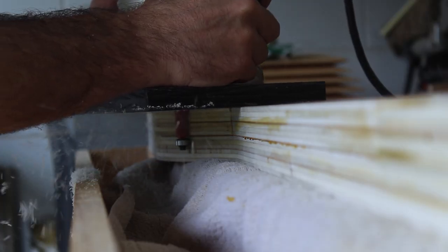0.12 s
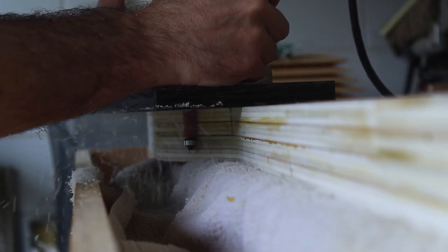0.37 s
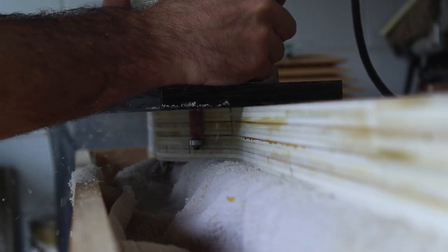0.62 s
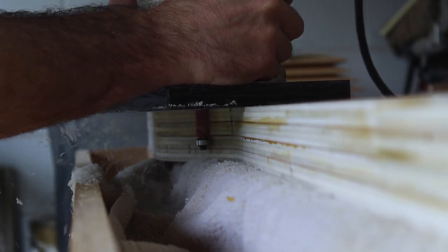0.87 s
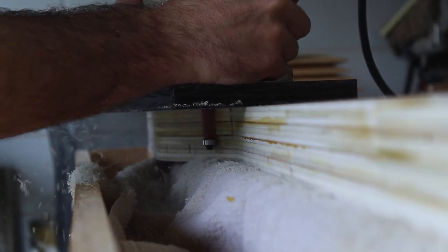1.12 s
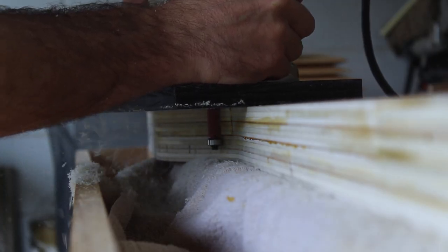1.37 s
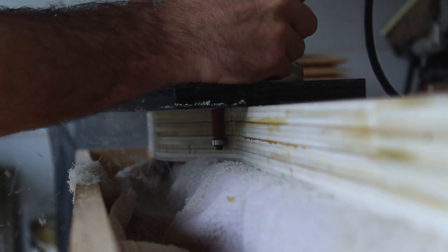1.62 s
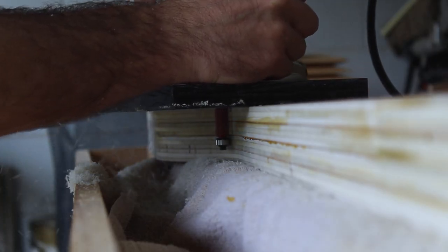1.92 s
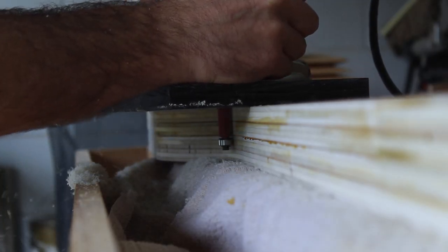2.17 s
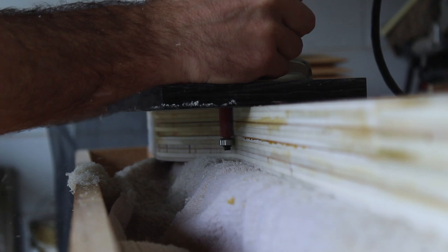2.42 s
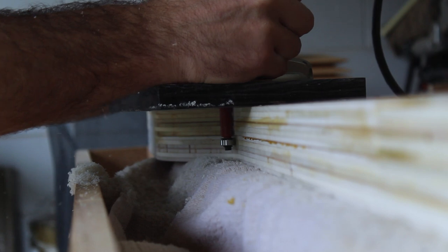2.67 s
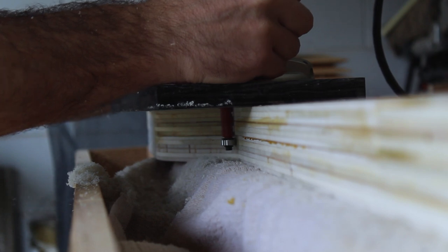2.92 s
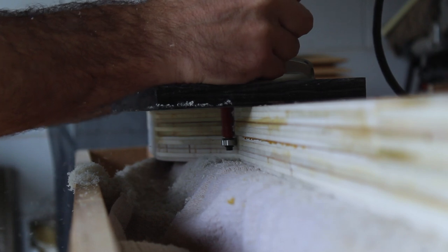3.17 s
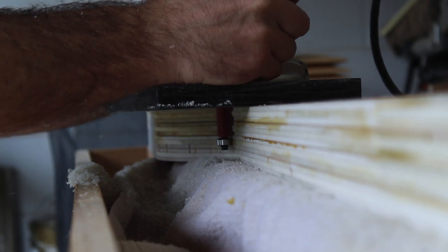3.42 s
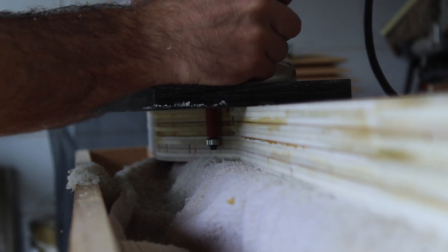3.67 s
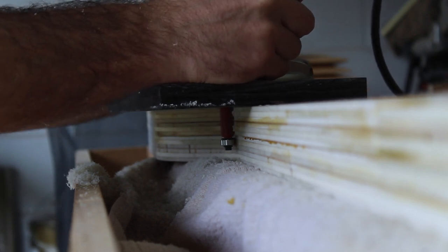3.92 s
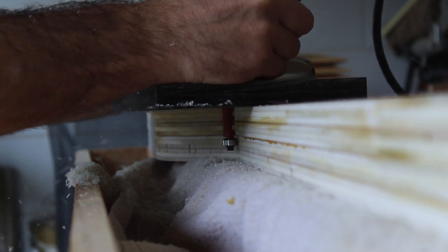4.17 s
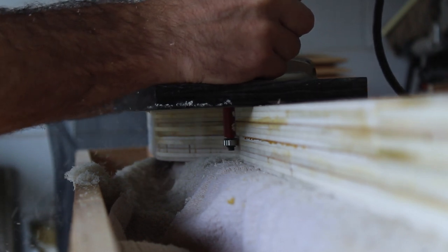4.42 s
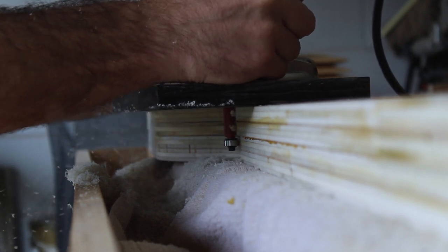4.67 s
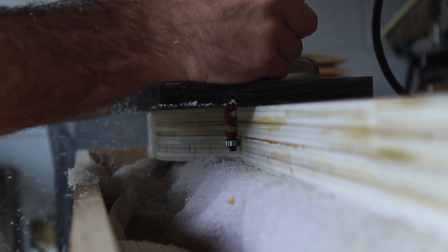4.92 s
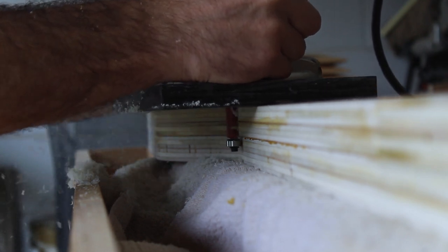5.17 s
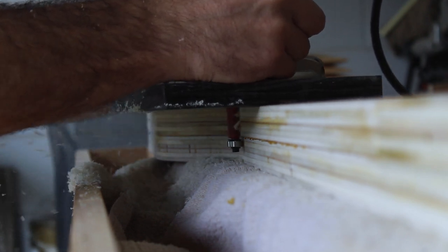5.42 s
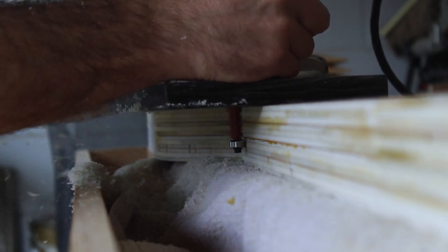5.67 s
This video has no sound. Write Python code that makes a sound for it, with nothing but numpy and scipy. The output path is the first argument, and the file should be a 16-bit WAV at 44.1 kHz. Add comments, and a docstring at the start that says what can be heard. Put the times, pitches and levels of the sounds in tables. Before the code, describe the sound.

A small trim router whines high and steady over dense hissing as it shaves a plywood edge, its pitch sagging and climbing with load.

```python
"""In a workshop a trim router runs along a plywood edge, heard through one thin-sounding microphone.
Its whine is a clean stack of overtones that sags under load and climbs when the cut lightens;
it is made of sine waves on whole multiples of one pitch.
Cooling air and the shearing of wood make a dense hiss: noise coloured by the housing, the board
and near surfaces, split into bands that rise, fall and flicker."""
import sys
import numpy as np
from scipy import signal
from scipy.fft import rfft, irfft
from scipy.io import wavfile
from scipy.ndimage import uniform_filter1d

SR = 44100
rng = np.random.default_rng(int(sys.argv[2]) if len(sys.argv) > 2 else 0)


def boost_factor(decibels):
    """Convert a level in decibels to a linear amplitude factor."""
    exponent = np.asarray(decibels, float) / 20
    return 10 ** exponent


def put_to_file(sound):
    """Save the sound as 16-bit audio at rate SR, in the file named by the first command-line argument."""
    columns = np.atleast_2d(sound).T  # one column per channel
    safe = np.clip(columns, -1, 1)
    whole_steps = np.round(safe * 32767)
    wavfile.write(sys.argv[1], SR, whole_steps.astype(np.int16))


N = 256220   # length of the scene in samples


def whine(jitter_hz, flutter_db, upper_flutter_db):
    """Overtones of the spindle's trembling pitch swell, drop out and break up while the pitch climbs."""
    # spindle pitch, sagging as the bit bites and jumping when the cut lightens: t/s, f/Hz
    pitch_path = [(0.0, 1700.0), (0.238, 1680.2), (0.442, 1682.6), (0.672, 1695.4), (0.946, 1667.3),
                  (1.091, 1648.2), (1.285, 1657.2), (1.385, 1650.1), (1.575, 1673.6), (1.699, 1653.9),
                  (1.919, 1693.5), (2.138, 1710.7), (2.173, 1721.4), (2.238, 1766.8), (2.293, 1775.6),
                  (2.687, 1777.6), (3.181, 1752.6), (3.231, 1768.5), (3.306, 1811.9), (3.396, 1832.3),
                  (3.959, 1856.3), (4.059, 1848.5), (4.179, 1765.9), (4.219, 1755.6), (4.343, 1738.6),
                  (4.638, 1731.7), (4.703, 1716.0), (4.852, 1709.3), (5.127, 1682.6), (5.351, 1651.7),
                  (5.471, 1665.6), (5.81, 1664.0)]
    # steady part of each overtone: multiple, level at 1730 Hz pitch/dB, gain per 100 Hz of pitch/dB
    steady = [(1, -69.5, 5), (2, -62, -4), (3, -68, 2), (4, -67, -0.5), (5, -67.5, 1.5), (6, -65, -1.5),
              (7, -66.5, -7), (8, -71, -1.5), (9, -86.5, -12.0)]
    # single overtones swell and fade again as the tool moves: centre t/s, multiple, length/s, level/dB
    swells = [(0.09, 5, 0.067, -60), (0.298, 8, 0.19, -71.5), (0.323, 4, 0.35, -58.5),
              (0.33, 6, 0.34, -66.5), (0.386, 9, 0.61, -62), (0.43, 2, 0.6, -62.5), (0.466, 1, 1.43, -62.2),
              (0.635, 4, 0.17, -63.2), (0.634, 5, 0.19, -58.5), (0.813, 9, 0.13, -62),
              (0.837, 4, 0.13, -53.5), (0.934, 5, 0.36, -68), (0.986, 2, 0.081, -61),
              (1.034, 6, 0.046, -58), (1.106, 4, 0.18, -61), (1.23, 9, 0.48, -69), (1.26, 6, 0.13, -61.5),
              (1.268, 8, 0.15, -66), (1.305, 7, 0.43, -63), (1.35, 5, 1.02, -58.5), (1.536, 2, 1.2, -58.5),
              (1.547, 1, 0.12, -69), (1.563, 6, 0.65, -70.5), (1.572, 4, 0.09, -60), (1.703, 7, 0.09, -56),
              (1.848, 3, 0.23, -65.5), (1.9, 8, 0.5, -70), (1.913, 1, 1.16, -66), (2.094, 4, 0.69, -65),
              (2.287, 7, 0.14, -60.8), (2.394, 8, 0.4, -67.5), (2.522, 7, 0.13, -59), (2.55, 5, 0.41, -72),
              (2.693, 1, 0.58, -64), (2.878, 4, 0.28, -59), (2.89, 7, 0.28, -59.5), (3.115, 5, 0.24, -61),
              (3.1, 8, 0.18, -68), (3.15, 4, 0.11, -61.4), (3.478, 6, 0.29, -65), (3.525, 1, 0.68, -62),
              (3.567, 5, 0.18, -64.5), (3.718, 2, 1.2, -68.9), (4.085, 4, 0.09, -65), (4.08, 7, 0.06, -67),
              (4.09, 6, 0.086, -67), (4.12, 5, 0.035, -62), (4.146, 3, 0.18, -72), (4.237, 7, 0.51, -65.6),
              (4.305, 4, 0.13, -66), (4.44, 5, 0.54, -59), (4.524, 4, 0.8, -59.5), (4.753, 7, 0.19, -59.5),
              (4.778, 9, 0.74, -68), (4.86, 1, 0.35, -64), (4.93, 4, 0.08, -64), (4.92, 5, 0.11, -63),
              (4.945, 7, 0.2, -62.5), (5.17, 8, 0.65, -71.5), (5.216, 6, 0.07, -57.5),
              (5.27, 2, 0.079, -62), (5.275, 3, 0.06, -60), (5.376, 5, 0.73, -60.5), (5.39, 2, 1.5, -64.5),
              (5.427, 6, 0.16, -62.5), (5.538, 3, 0.9, -68.5), (5.606, 2, 0.67, -55.5),
              (5.74, 6, 0.13, -65), (5.81, 9, 0.68, -64)]
    # single overtones drop out for a moment: centre t/s, multiple, length/s, loss/dB
    dropouts = [(0.132, 4, .06, 12), (0.482, 2, 0.054, 2), (0.51, 4, .06, 19), (0.66, 2, 0.056, 3),
                (0.67, 6, 0.11, 7), (0.757, 5, 0.042, 12), (0.87, 2, 0.055, 21), (0.923, 6, .06, 12),
                (1.307, 4, 0.045, 15), (1.856, 2, .04, 5), (2.22, 1, 0.028, 14), (2.4, 7, .08, 7),
                (2.647, 7, 0.15, 13), (3.064, 1, 0.053, 1), (3.234, 5, 0.038, 8), (3.733, 5, .08, 17),
                (4.07, 5, 0.045, 16), (4.136, 1, 0.041, 8), (4.8, 5, .06, 15), (5.1, 7, 0.12, 6),
                (5.15, 4, .08, 6), (5.377, 3, 0.042, 14), (5.582, 4, .1, 15)]

    # the spindle's inertia rounds the corners
    pitch = uniform_filter1d(in_time(pitch_path), 1300, mode="nearest")
    # climbing speed in 1000 Hz a second; falling pitch counts as none
    climb = np.maximum(np.gradient(pitch), 0) * SR / 1000
    climb = uniform_filter1d(climb, 1500)
    trembling_pitch = pitch + jitter_hz * drift(25.0)
    phase = 2 * np.pi * np.cumsum(trembling_pitch) / SR

    out = np.zeros(N)
    for multiple, level_db, slope_db in steady:
        height = boost_factor(level_db + slope_db * (pitch - 1730) / 100)
        for centre_s, which, length_s, swell_db in swells:
            if which == multiple:
                near, shape = hump(centre_s, length_s)
                height[near] += boost_factor(swell_db) * shape
        for centre_s, which, length_s, loss_db in dropouts:
            if which == multiple:
                near, shape = hump(centre_s, length_s)
                height[near] *= boost_factor(-loss_db * shape)
        flutter = flutter_db * drift(27.0)
        if multiple > 2:
            flutter += upper_flutter_db * drift(9.8)
        # ragged loss in dB: at least 2 for each 1000 Hz a second of climb
        breakup = climb * (2 + 4 * drift(22.0) ** 2)
        tone = np.sin(multiple * phase + rng.uniform(0, 2 * np.pi))
        out += height * boost_factor(flutter - breakup) * tone
    return np.sqrt(2) * out   # a sine's peak is root 2 above its average (rms) level


def hump(centre_s, length_s):
    """Samples that a swell or dropout covers, and its shape there: 1 on top, 1/e at the ends of its length."""
    start = max(0, int((centre_s - length_s) * SR))
    end = min(N, int((centre_s + length_s) * SR))
    near = np.arange(start, end)
    distance = np.abs(2 * (near / SR - centre_s) / length_s)
    # a power of 2 would be a bell; higher means a flatter top and steeper flanks
    return near, np.exp(-distance ** 3.3)


def hiss(shared_db, own_db, thump_db, low_share, top_share):
    """Air and cut wood make coloured noise: octave bands surge together and flicker alone, the lowest in lumps."""
    # rise and fall with the feed of the cut, before each band takes its share: t/s, level/dB
    feed_level = [(0.0, -49.5), (0.35, -50.5), (0.62, -50.5), (1.0, -52), (1.31, -53), (1.56, -50.5),
                  (1.84, -52), (1.93, -49.5), (2.02, -50.5), (2.3, -49.5), (3.05, -52), (3.15, -51),
                  (3.85, -49.5), (4.28, -51.5), (4.8, -50), (5.06, -51), (5.17, -51.5), (5.55, -53),
                  (5.71, -50.5), (5.81, -53.5)]

    hz = np.fft.rfftfreq(N, 1 / SR)
    spectrum = rfft(rng.standard_normal(N)) * colour(hz)
    spectrum /= irfft(spectrum, N).std()
    level_db = in_time(feed_level)
    mean_db = level_db.mean()
    surge_db = level_db - mean_db + shared_db * drift(14.0)

    out = np.zeros(N)
    for centre_hz in 30 * 2.0 ** np.arange(10):
        # neighbouring bands overlap so that their gains add up to one
        octaves = np.clip(np.log2((hz + 1) / centre_hz), -1, 1)
        band = irfft(spectrum * np.cos(octaves * np.pi / 2) ** 2, N)
        wobble_db = thump_db if centre_hz < 130 else own_db
        # the bite of the cut is strongest in the upper middle
        if centre_hz < 2500:
            share = low_share
        elif centre_hz < 9000:
            share = 1
        else:
            share = top_share
        out += band * boost_factor(share * surge_db + wobble_db * drift(22.0))
    return out * boost_factor(mean_db)


def colour(hz):
    """Gain of the hiss: a smooth slope, lifted or dipped at resonances, rippled by scattered reflections."""
    # broad slope of the hiss, only relative: f/Hz, level per Hz/dB
    slope = [(30, -52), (130, -42.5), (400, -39.5), (850, -23), (1070, -21.5), (1500, -11), (2000, -4),
             (2500, -2), (3200, -3.5), (6000, -1), (7200, -8.5), (10500, -9.5), (12500, -11), (15500, -10)]
    # housing, board and near surfaces: f/Hz, width (at a quarter of the lift)/Hz, lift or dip/dB
    resonances = [(300, 202, 7.1), (480, 58, 5.9), (690, 258, 6.1), (900, 87, 5.8), (990, 70, 6.7),
                  (1060, 43, -2.5), (1320, 94, 4.4), (1450, 64, 3.6), (1510, 57, -7.3), (1770, 150, 4.8),
                  (1970, 43, -7.3), (2220, 69, 4.8), (2470, 79, 4.4), (2560, 112, 5.0), (2770, 120, 6.4),
                  (2960, 449, 3.3), (3560, 118, 5.4), (3880, 85, 4.7), (3990, 64, 6.1), (4100, 55, 7.0),
                  (4270, 238, 6.0), (4720, 85, 4.9), (5000, 77, 4.1), (5170, 90, 5.9), (5360, 122, 6.0),
                  (5780, 54, 5.1), (5980, 345, 3.7), (6630, 169, 4.9), (6770, 155, 4.4), (10810, 827, 4.7),
                  (13620, 240, 3.3), (15200, 516, 2.8)]

    slope_hz, slope_db = np.transpose(slope)
    db = np.interp(np.log(hz + 1), np.log(slope_hz), slope_db)
    for centre_hz, width_hz, lift_db in resonances:
        offset = 2 * (hz - centre_hz) / width_hz
        db += lift_db / (1 + offset ** 2) ** 2

    # twelve equally strong reflections, upright or inverted
    latest_s, echo_db = 0.014, -26.0
    delays = rng.uniform(.3, 1, 12) * latest_s
    signs = rng.choice([-1, 1], 12)
    echoes = sum(sign * np.exp(-2j * np.pi * hz * delay) for delay, sign in zip(delays, signs))
    return boost_factor(db) * (1 + boost_factor(echo_db) * echoes)


def in_time(rows):
    """Joins (t/s, value) points by straight lines, one value a sample."""
    seconds, values = np.transpose(rows)
    return np.interp(np.arange(N) / SR, seconds, values)


def drift(rate_hz):
    """Slow random wandering of spread 1: noise smoothed twice, with one value for every 40 samples."""
    r = np.exp(-2 * np.pi * rate_hz * 40 / SR)
    noise = rng.standard_normal(N // 40 + 2002)
    slow = signal.lfilter([1], [1, -2 * r, r * r], noise)[2000:]   # skip the filter's start
    return np.interp(np.arange(N) / 40, np.arange(len(slow)), slow / slow.std())


def scene():
    """Whine and hiss add up at one microphone, which feeds both channels."""
    router = whine(jitter_hz=0.36, flutter_db=0.9, upper_flutter_db=2.0)
    router += hiss(shared_db=0.88, own_db=0.39, thump_db=3.0, low_share=0.75, top_share=0.93)
    return np.array([router, router])


def top_cut(x):
    """Nothing passes above the cut-off."""
    return signal.sosfilt(signal.butter(12, 16110, fs=SR, output="sos"), x)


def record(dry):
    """A steep low-pass filter removes the very top of the sound."""
    # 0.2 dB ripple below 15750 Hz, at least 70 dB down soon above it
    low_pass = signal.ellip(14, .2, 70, 15750, fs=SR, output="sos")
    cut = signal.sosfilt(low_pass, dry)
    return top_cut(cut)


dry = scene()
out = record(dry)
put_to_file(out)
```